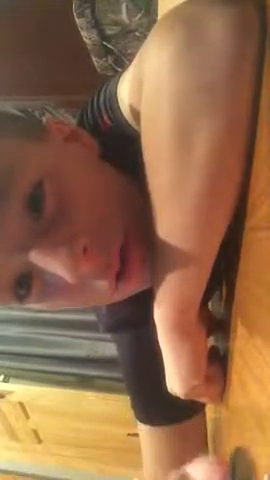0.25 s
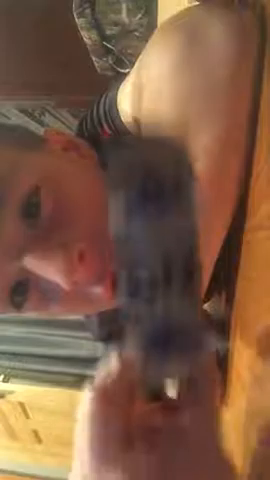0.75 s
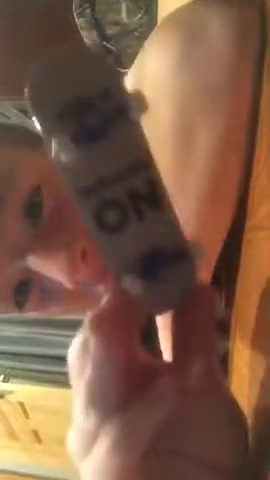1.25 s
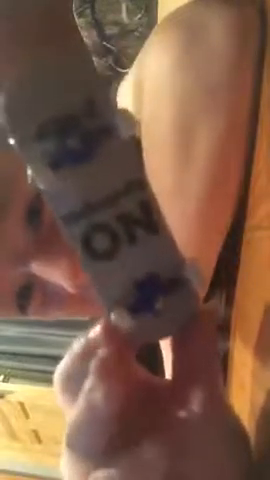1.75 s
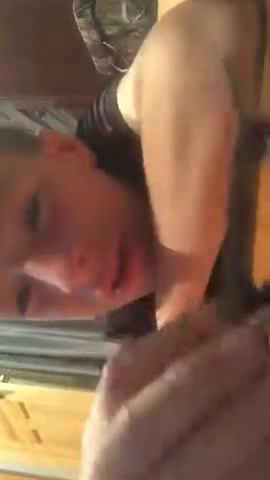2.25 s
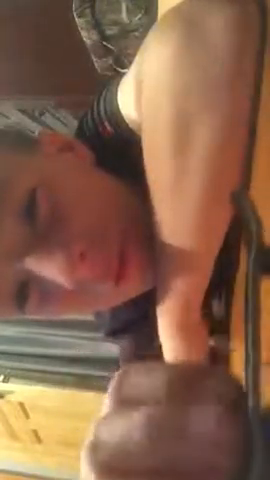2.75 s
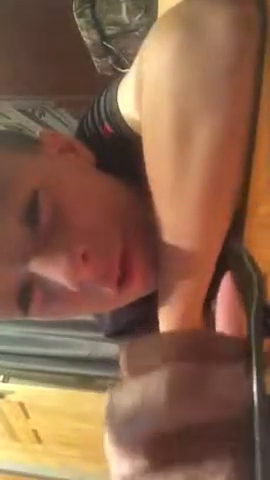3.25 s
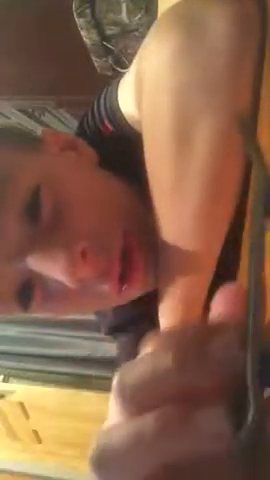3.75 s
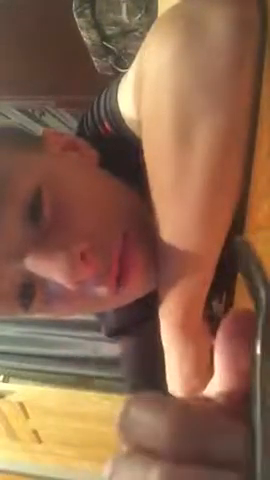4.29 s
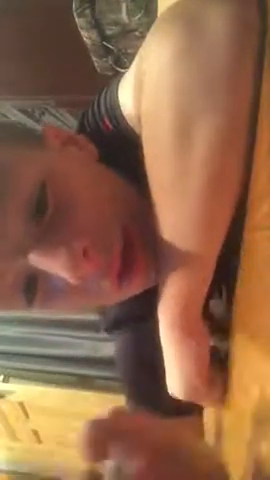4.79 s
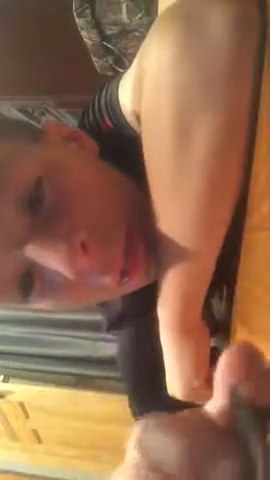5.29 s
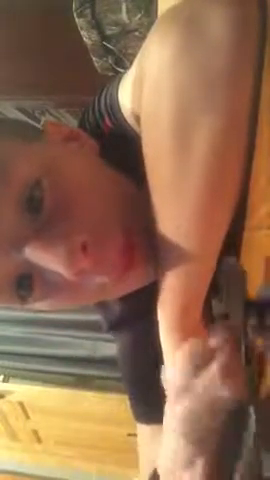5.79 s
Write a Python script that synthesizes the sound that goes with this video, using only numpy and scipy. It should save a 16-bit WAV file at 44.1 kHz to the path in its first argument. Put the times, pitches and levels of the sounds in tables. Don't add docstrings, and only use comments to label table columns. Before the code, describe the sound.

A toy skateboard is handled on a wooden table, very close to a phone microphone in a small furnished room with faint hiss and low room tone. At 0 s a soft palm thud and a short rumble of tiny wheels, then light ticks and a modest landing clack at 0.5. Quiet rolling leads to a loud, bright pop at 0.95 and a hard landing at 1.1. Soft rubbing until 1.8, then a rattling cluster of clacks around 1.95 and smaller knocks to 2.5. Another sharp pop at 2.7, landing at 2.9. From 3 to 4 only scrapes, faint taps and rubs. A loud pop at 4.15, woody slaps at 4.3, another at 4.65, then rolling and ticks. The last strong pop comes at 5.4, a heavy clattering landing at 5.6, a smaller slap at 5.95 and a final brief rumble. Dry, irregular, slightly overloaded.

```python
import sys
import numpy as np
from scipy import signal
from scipy.fft import rfft, irfft
from scipy.io import wavfile
from scipy.ndimage import uniform_filter1d

SR = 44100
rng = np.random.default_rng(int(sys.argv[2]) if len(sys.argv) > 2 else 0)


def wav_record(signal):
    frames = np.transpose(np.atleast_2d(signal))
    bounded = np.clip(frames, -1, 1)
    quanta = np.round(bounded * 32767).astype(np.int16)
    wavfile.write(sys.argv[1], SR, quanta)


def boost_factor(decibels):
    exponent = np.asarray(decibels, float) / 20
    return 10 ** exponent


N = 265923

# (frequency [Hz], level [dB], t60 [s])
TABLE_MODES = [(179, -2.5, 0.051), (246.2, 11.5, 0.043), (285, 7, 0.018)]
# (frequency [Hz], level [dB], t60 [s])
DECK_MODES = [(503.8, 8.5, 0.016), (570.5, 10.5, 0.016), (693.3, 11, 0.014), (800, 9.5, 0.0076),
              (950, 3, 0.015), (1100, 0, 0.021), (1270, -3.5, 0.024), (1505, -1.5, 0.009),
              (1650, -5, 0.018)]
# (time [s], frequency [Hz])
FREE_RING = [(0, 955), (.47, 850), (.93, 1050), (1.11, 713), (1.8, 1200), (1.96, 700), (2.18, 950),
             (2.35, 693), (2.64, 942), (2.89, 959), (3.3, 689), (4.13, 1100), (4.3, 828), (4.5, 680),
             (4.8, 729), (5.42, 1150), (5.6, 637), (6, 800)]
FREE_RING_DB = 4
DECK_LOW_HZ = 460
TAIL_HZ = 6200
TICK_MS = 1.8


def scaled(x, db):
    return x * boost_factor(db) / np.sqrt(np.mean(x ** 2))


def filtered(x, order, hz, kind):
    return signal.sosfilt(signal.butter(order, hz, kind, fs=SR, output="sos"), x)


def decay(t, t60):
    return np.exp(-np.log(1000) * t / t60)


def add(out, s, x):
    i = max(int(s * SR), 0)
    out[i:i + len(x)] += x[:len(out) - i]


def along(curve, s):
    return np.interp(s, *np.transpose(curve))


def favour(hz, centre_hz, db, spread=0.21):
    return db * np.exp(-(np.log(hz / centre_hz) / spread) ** 2)


def walk(rate):
    hold = int(SR / rate)
    steps = np.repeat(rng.standard_normal(N // hold + 1), hold)
    return np.clip(uniform_filter1d(steps, hold)[:N], -1.5, 1.5)


def air():
    # (frequency [Hz], density [dB per Hz])
    floor = [(26, -28), (45, -2), (90, 0.5), (125, -12), (205, 3.5), (431, -4.5), (908, -15.5),
             (1570, -14.5), (10300, -25), (17000, -35.5)]
    hz, db = np.transpose(floor)
    f = np.fft.rfftfreq(N, 1 / SR)
    shape = boost_factor(np.interp(np.log(f + 1), np.log(hz), db))
    hiss = irfft(rfft(rng.standard_normal(N)) * shape, N)
    hum = boost_factor(-71.5) * np.sin(2 * np.pi * 120 * np.arange(N) / SR)
    return scaled(hiss, -60) + hum


def room(x):
    # (frequency [Hz], t60 [s], level [dB])
    bands = [(140, 0.33, -21), (556, 0.28, -12), (1100, 0.34, -10), (1960, 0.19, -14.5), (4560, 0.34, -18),
             (7000, 0.19, -14), (11100, 0.35, -13.5), (16000, .2, -14.5)]
    early_db, early_s = 4.5, 0.021
    t = np.arange(int(.6 * SR)) / SR
    hz, t60, db = np.transpose(bands)
    tail = 0
    for f in 80 * 2 ** np.arange(0, 7.9, .5):
        band = filtered(rng.standard_normal(len(t)), 2, [f / 1.19, f * 1.19], "bandpass")
        band_t60, gain_db = (np.interp(np.log(f), np.log(hz), c) for c in (t60, db))
        tail = tail + boost_factor(gain_db) * band * decay(t, band_t60) / np.sqrt(band_t60 * SR / 14)
    onset = np.clip((t - .005) / 0.0037, 0, 1)
    return signal.fftconvolve(x, tail * boost_factor(early_db * np.exp(-t / early_s)) * onset)[:N]


def thuds():
    # (time [s], level [dB])
    settlings = [(0.009, -47), (0.49, -40.5), (0.91, -44), (1.111, -35), (1.229, -57), (2.641, -43),
                 (2.727, -66), (2.918, -37), (4.15, -43), (4.348, -37), (5.322, -46), (5.622, -36.5)]
    centre_hz, swell_s = 72, 0.035
    out, u = np.zeros(N), np.arange(SR // 4) / SR / swell_s
    for s, db in settlings:
        rumble = filtered(rng.standard_normal(len(u)), 2, [centre_hz / 2.4, centre_hz * 1.2], "bandpass")
        rumble = rumble * u * np.exp(-u)
        add(out, s - .02, boost_factor(db + 13.5) * rumble / np.abs(rumble).max())
    return out


def grit(modes, per_s, size_db, smooth, wander_db, wander_rate, centre_hz=1., centre_db=0.):
    happens = rng.random(N) < per_s / SR
    size = boost_factor(np.clip(size_db * rng.exponential(size=N), 0, 9))
    ticks = happens * size * np.clip(rng.standard_normal(N), -2, 2)
    push = scaled(ticks, 0) + smooth * rng.standard_normal(N)
    push = uniform_filter1d(push, max(int(SR / modes[-1][0] / 3), 1))
    out = 0
    for k, (hz, db, t60) in enumerate(modes):
        r = decay(1 / SR, t60)
        tone = signal.lfilter([1, 0, -1], [1, -2 * r * np.cos(2 * np.pi * hz / SR), r * r], push)
        mode_db = db + favour(hz, centre_hz, centre_db) + wander_db * walk(wander_rate)
        out = out + (-1) ** k * boost_factor(mode_db) * tone
    return scaled(out, 0)


def pushes(t):
    # (time of
    # most weight [s], dying time [s], deck level [dB], wheel spin level [dB], table level [dB])
    strokes = [(.01, 0.085, -25, -36, -38), (.34, 0.17, -40, -57, -40), (0.581, 0.099, -37, -47, -81),
               (.66, 0.1, -50.5, -63.5, -66.5), (1.06, 0.3, -43, -48.5, -55.5),
               (1.39, 0.073, -45.5, -43.5, -78.5), (1.47, 0.057, -51, -52, -41),
               (2.13, 0.15, -39.5, -51, -47), (2.32, 0.14, -39.5, -48.5, -45), (2.8, 0.33, -48, -54, -58),
               (2.95, 0.04, -56, -65.5, -42.5), (3.17, 0.23, -51, -51, -73.5),
               (3.26, 0.21, -41.5, -55.5, -48.5), (4.13, 0.066, -28.5, -46.5, -60),
               (4.26, 0.09, -31, -47, -37), (4.47, 0.22, -51.5, -54.5, -50), (4.68, 0.093, -44, -51, -44),
               (4.8, 0.13, -30.5, -43.5, -45), (4.94, 0.31, -42.5, -51.5, -46), (5.02, 0.11, -42, -51.5, -60),
               (5.12, 0.083, -43, -66, -70), (5.59, .1, -45, -47.5, -41), (6.03, 0.077, -24.5, -44, -38.5),
               (0.259, 0.098, -47, -58, -51), (1.36, 0.055, -74, -51, -76),
               (1.44, 0.056, -39.5, -51.5, -81), (1.86, 0.028, -63.5, -54, -66), (2.21, .05, -53, -49, -64),
               (2.285, 0.03, -63, -52, -59), (2.42, 0.022, -47, -52.5, -60),
               (2.514, 0.045, -49, -62.5, -53), (3.41, 0.044, -38, -59, -60), (3.639, 0.056, -45, -58, -58),
               (0.121, 0.054, -42, -56, -69), (0.819, 0.046, -48, -80.5, -67),
               (.73, 0.077, -47.5, -66.5, -52), (1.58, 0.044, -89, -62, -69), (1.29, 0.052, -97, -76, -48),
               (1.9, 0.076, -57, -61, -84.5), (2.48, .2, -36, -60, -56), (3.07, 0.034, -33, -63, -26.5),
               (3.43, 0.087, -41, -63, -58), (3.779, 0.12, -44, -54, -52), (3.91, 0.13, -39, -69.5, -56),
               (5.27, 0.23, -40, -72, -46.5), (5.438, 0.11, -35, -65, -49.5), (5.93, 0.12, -40, -57, -51)]
    # (table [dB], deck [dB], axle [dB], grip [dB])
    rest_db = (-64, -68, -82, -76)
    fade_db, rise_share, spin_fade = 21.5, 1, 1.87
    shake_db, shake_s = -30.5, 0.032
    slow = t[::64]
    gains = boost_factor(rest_db)[:, None] + 0 * slow
    for s, fade_s, deck_db, spin_db, table_db in strokes:
        drop_db = fade_db * np.maximum(slow - s, (s - slow) / rise_share) / fade_s
        spin = spin_db - spin_fade * drop_db ** 2 / fade_db
        grip = spin - 6.5
        gains = gains + boost_factor([table_db - drop_db, deck_db - drop_db, spin, grip])
    table, deck, axle, grip = (np.interp(t, slow, g) for g in gains)
    for s, _, thump_db, *_ in contacts():
        add(table, s, boost_factor(thump_db + shake_db) * np.exp(-t[:SR // 4] / shake_s))
    return table, deck, axle, grip


def rolling():
    # (time [s], length [s], axle level [dB], deck level [dB])
    drags = [(0.193, 0.095, -48.5, -45), (0.939, 0.022, -33, -19.5), (1.322, 0.04, -45.5, -82),
             (1.728, 0.052, -40.5, -47.5), (2.711, 0.0095, -46.5, -30), (2.798, 0.013, -34, -32),
             (2.984, 0.042, -45, -35), (3.095, 0.051, -52, -36), (3.214, 0.028, -55.5, -60),
             (3.584, 0.083, -48.5, -37.5), (3.98, 0.026, -55.5, -61), (4.122, 0.015, -28, -28),
             (4.267, 0.019, -37, -56), (5.359, 0.085, -48.5, -43.5), (5.406, 0.025, -37, -31),
             (5.858, 0.069, -59, -42.5)]
    # (frequency [Hz], level [dB], t60 [s])
    rub_modes = [(1670, -8, .005), (2200, -2.5, .009), (2800, -6.5, 0.0054), (3550, -4.5, .009),
                 (4050, -4.5, 0.0059), (4800, -3.5, 0.0054), (5500, -2, 0.01), (6200, -2.5, 0.0082),
                 (6720, 1.5, 0.003), (9500, -13, 0.0022), (12000, -25.5, .001)]
    # (time [s], frequency [Hz])
    rubbing_part = [(0, 4500), (.3, 2600), (.6, 3810), (1.36, 3300), (1.45, 4560), (1.58, 6200),
                    (1.76, 2200), (2.2, 4200), (2.3, 5600), (2.5, 5500), (3.0, 3500), (3.27, 3543),
                    (3.41, 2150), (3.99, 5840), (4.28, 2910), (4.78, 2300), (5.0, 4040), (5.9, 2440)]
    t = np.arange(N) / SR
    table, deck, axle, grip = pushes(t)
    for start, length, axle_db, deck_db in drags:
        u = t[:SR // 4] / length
        stop = np.exp(-np.clip(u - 1, 0, None) / 0.15)
        swell = np.clip(u, 0, 1) ** .45 * stop
        add(table, start, swell * boost_factor(deck_db - 3))
        add(deck, start, swell * boost_factor(deck_db))
        add(axle, start, swell * boost_factor(axle_db))
        add(grip, start, swell * boost_factor(axle_db - 5.5))
    press = boost_factor(2.5 * walk(25))
    deck_rub = grit(DECK_MODES, 450, 2.8, .6, 3, 17, along(FREE_RING, t), FREE_RING_DB)
    deck_rub = filtered(deck_rub, 2, DECK_LOW_HZ, "highpass")
    low = table * grit(TABLE_MODES, 600, 1.5, 1.2, 1.5, 12) + deck * deck_rub
    low = filtered(low, 1, 1610, "lowpass")
    part_hz, part_db = along(rubbing_part, t), 5
    high = axle * grit(rub_modes[:6], 1300, 3, .7, 4.5, 30, part_hz, part_db)
    high = high + grip * grit(rub_modes[6:], 1600, 3, .7, 4.5, 30, part_hz, part_db)
    return press * (low + high * boost_factor(2.5 * walk(70)))


def contacts():
    # (time [s], axle clack peak [dB], table thump [dB], deck knock [dB], chatter [ms])
    tail_pops = [
        (.9624, 3.5, -4, -14, 2.4),
        (2.7256, 4, -1.5, -9.5, 1.83),
        (3.46, -18, -23.5, -18.5, 1.95),
        (3.7484, -18, -24, -24.5, 0.35),
        (3.8076, -15, -18, -20.5, 3.2),
        (4.1458, 4.5, -0.5, -11, 1.4),
        (5.4296, 4.5, 2, -7.5, 1.18),
    ]
    wheel_landings = [(.4738, -10.5, -13, -10.5, 1.28), (.4918, -22, -21, -19.5, 1.7),
                      (.9311, -16.5, -27.5, -13.5, 1.7), (1.1076, 6, -0.5, -10.5, 1.77),
                      (1.1377, -6, -39.5, -11.5, 1.4), (1.1478, -7, -1, -28, 2.5),
                      (1.9354, -6.5, -14.5, -23, 1), (1.9482, -15, -32.5, -24, 0.49),
                      (1.9644, 0.5, -3.5, -4.5, 1.9), (2.0083, -15, -13.5, -18.5, 2),
                      (2.1868, -6.5, -16, -13.5, 1.64), (2.364, -22.5, -22, -18, 1.4),
                      (2.8496, -2, -7.5, -13, 1.9), (2.873, -15, -39, -28, 0.69),
                      (2.89, 0.5, -7.5, -2, 1.6), (3.053, -13.5, -15, -27.5, 0.99),
                      (4.6746, -13, -12, -12, 2.4), (4.856, -14, -19, -25, 2.7), (5.588, -7, -41, -14, 2.3),
                      (5.6119, 1.5, 2, 4.5, 1.67), (5.6334, -19, -10, -27, 2)]
    edge_slaps = [(.2322, -22.5, -26, -23, 3.5), (1.802, -8.5, -29.5, -11.5, 1.56),
                  (1.9424, -4, -21, -13.5, 1.2), (2.334, -21.5, -24, -15.5, 2.9),
                  (3.3206, -16, -51, -17, 1.46), (4.134, -8.5, -39.5, -51, 5.4),
                  (4.2772, -24, -29.5, -15, 5.8), (4.3133, -15.5, -32, -4.5, 3.4),
                  (4.3179, -4, 2.2, -40.5, 1.6), (4.3314, 1, -5, -4, 2.6), (4.3462, -23, -35, -33, 4.5),
                  (4.4889, -14.5, -19.5, -14, 1.84), (4.5587, -23.5, -18, -19.5, 0.81),
                  (4.6518, -0.5, -1, -2.5, 1.68), (5.6116, 4, -33.5, -26, 3),
                  (5.939, -18, -1.5, -11.5, 0.96)]
    # (time [s], peak [dB], brightest ring [Hz])
    axle_ticks = [(0.0972, -30.5, 4190), (0.2167, -28, 4570), (0.5425, -29, 4300), (0.6098, -26, 4140),
                  (0.899, -31.5, 6200), (1.044, -45, 6500), (1.2555, -36, 6600), (1.4587, -36, 5230),
                  (1.8174, -24.5, 6700), (1.978, -12.5, 3320), (2.1825, -13, 4440), (2.286, -26, 2060),
                  (2.32, -25, 2170), (2.4534, -34, 3800), (2.799, -25, 4230), (2.807, -34, 3640),
                  (2.8815, -18, 4010), (3.0472, -25.5, 4450), (3.1112, -24, 3420), (3.4528, -28.5, 4260),
                  (3.982, -49, 6200), (4.1133, -24.5, 2140), (4.8288, -19, 4600), (4.982, -29, 4010),
                  (5.0205, -40, 3880), (5.0759, -22.5, 6100), (5.4072, -29, 2260), (5.5774, -23.5, 4150),
                  (5.74, -24.5, 2300), (5.875, -26.5, 2230)]
    # (time [s], deck level [dB], table level [dB])
    soft_knocks = [(.2683, -40, -27.5), (.3583, -30, -29), (.4002, -31, -64), (.4597, -23, -49),
                   (.7544, -53, -44), (2.1107, -25, -20.5), (2.3057, -23.5, -55), (2.413, -17, -31),
                   (2.4264, -20, -41), (2.5026, -25, -24), (2.6318, -28, -23), (2.6404, -15.5, -41),
                   (2.6615, -17, -32), (2.8634, -18.5, -27), (3.019, -24.5, -44), (3.1395, -21.5, -45),
                   (3.3444, -26, -19.5), (3.3997, -25, -57), (3.4129, -21.5, -51), (3.6045, -25, -31),
                   (3.6574, -19, -41), (4.0617, -30.5, -28.5), (4.2125, -29, -17), (4.6634, -22, -37),
                   (4.9423, -20, -40), (5.0035, -21, -44), (5.7495, -29, -32), (5.9963, -27.5, -61)]
    # (time [s], axle level [dB], deck level [dB], brightest ring [Hz], chatter [ms])
    rebounds = [(.2668, -31.5, -34, 5000, 2), (.4005, -43, -64, 4600, 1.8), (.681, -41, -50, 3820, 2.3),
                (1.6695, -55, -58.5, 6000, 1.5), (1.9385, -10, -17, 3430, 2),
                (1.9462, -9.5, -19, 4500, 1.5), (2.0005, -23, -33, 4000, 2.6), (2.306, -34, -33, 6700, 2),
                (2.413, -34.5, -43, 7000, 3.3), (2.427, -38, -52, 7000, 1.6), (2.505, -35, -50, 5500, 2),
                (2.6299, -27.5, -43, 5630, 1.7), (2.857, -12, -19, 4000, 1.4), (2.868, -19, -43, 4030, 1),
                (3.021, -28, -42, 3430, 1.8), (3.1398, -37, -51, 2140, 2.5), (3.5892, -40, -51, 7000, 1.6),
                (4.0597, -40, -50, 6000, 2), (4.072, -38, -37, 2200, 2.2), (4.6675, -13.5, -24, 5500, 1.5),
                (4.7815, -36, -45, 6000, 1.3), (4.9432, -22, -42, 4020, 2.2),
                (5.4325, -2.5, -15.5, 4300, 1.2), (5.6195, -17, -11.5, 4600, 1.5)]
    tick_table_db, tick_deck_db = -15.5, -7
    rows = []
    for kind, hz in ((tail_pops, TAIL_HZ), (wheel_landings, 4150), (edge_slaps, 2440)):
        rows += [(s, axle, table, deck, hz, ms) for s, axle, table, deck, ms in kind]
    rows += [(s, db, db + tick_table_db, db + tick_deck_db, hz, TICK_MS) for s, db, hz in axle_ticks]
    rows += [(s, deck - 15, table, deck, 2600, 2.6) for s, deck, table in soft_knocks]
    rows += [(s, axle, axle + tick_table_db, deck, hz, ms) for s, axle, deck, hz, ms in rebounds]
    return rows


def evened(push):
    spec = rfft(push)
    even = irfft(spec / np.sqrt(uniform_filter1d(np.abs(spec) ** 2, size=21)), len(push))
    return even * np.clip(np.linspace(5, -1, len(push)), 0, 1)


def ring(modes, tweak_db, detune):
    hz, db, t60 = np.transpose(modes)[:, :, None]
    t = np.arange(int(SR * t60.max())) / SR
    sines = np.sin(2 * np.pi * hz * detune[:, None] * t) * decay(t, t60)
    sign = (-1.) ** np.arange(len(modes))[:, None]
    return (sign * boost_factor(db + tweak_db[:, None]) * sines).sum(axis=0)


def struck(push, modes, chance, favour_db=0.):
    k, chance = len(modes), np.clip(chance, -1.6, 1.6)
    response = ring(modes, 2.5 * chance[:k] + favour_db, 1 + .02 * chance[-k:])
    x = signal.fftconvolve(push, response)
    return x / np.abs(x).max()


def clacks():
    # (frequency [Hz], level [dB], t60 [s])
    axle_modes = [(2230, -2, 0.0038), (3014, -11, 0.013), (3350, -4, 0.0052), (3890, 0, 0.0048),
                  (4312, 2.5, 0.0036), (5205, -3.5, 0.0048), (6065, 1.5, 0.0031), (7100, 4.5, 0.0012),
                  (8550, -1.5, 0.0017), (9500, -9.5, 0.0018)]
    buzz_db, buzz_s = -43, 0.021
    crack_db, crack_hz = -23, 8000
    out, t = np.zeros(N), np.arange(3072) / SR
    axle_hz = np.array(axle_modes)[:, 0]
    deck_hz = np.array(DECK_MODES)[:, 0]
    for s, axle_db, table_db, deck_db, hz, ms in contacts():
        chatter = rng.standard_normal(len(t))
        axle_chance, deck_chance, table_chance = rng.standard_normal((3, 24))
        u = t / (max(ms, .3) / 1000)
        fade = (1 - np.exp(-u / 0.26)) * np.exp(-u ** 1.06)
        buzz = boost_factor(buzz_db) * np.exp(-t / buzz_s) * np.clip(u, 0, 1)
        hardness = 2.8 * np.log2(hz / 4000) + 0.13 * (axle_db + 5)
        hard_db = hardness * np.clip(np.log2(axle_hz / 4000), 0, None)
        favour_db = favour(axle_hz, hz, 6.5 + 0.11 * axle_db, 0.32) + hard_db
        blow = evened(np.roll((fade + buzz) * chatter, 64))
        clack = struck(blow, axle_modes, .7 * axle_chance, favour_db)
        add(out, s - .0026, boost_factor(axle_db - 1.5) * clack)

        crack = evened(np.roll((fade + buzz) * chatter[::-1], 64))
        crack = filtered(crack, 2, [crack_hz, crack_hz * 1.7], "bandpass")
        add(out, s - .0024, boost_factor(axle_db + crack_db + 1.7 * hard_db[-1]) * crack / np.abs(crack).max())

        is_pop = hz == TAIL_HZ and ms != TICK_MS
        free_hz = 534 if is_pop else along(FREE_RING, s)
        blow = filtered(fade * (0.24 + chatter), 2, DECK_LOW_HZ, "highpass")
        knock = struck(blow, DECK_MODES, 0.92 * deck_chance, favour(deck_hz, free_hz, FREE_RING_DB))
        add(out, s - .0008, boost_factor(deck_db - 3.0) * knock)

        thump = struck(np.hanning(80), TABLE_MODES, 1.1 * table_chance)
        add(out, s + 0.00036, boost_factor(table_db - 10.5) * thump)
    return out


def scene():
    dry = clacks() + rolling()
    return (dry + room(dry) + thuds())[None]


def band_limit(x):
    return signal.sosfilt(signal.butter(12, 18440, fs=SR, output="sos"), x)


def record(dry):
    thin = filtered(dry, 2, 175, "highpass") + air()
    clipped = np.clip(thin, -1.02, 1.02)
    cut = signal.sosfilt(signal.ellip(6, .3, 45, 17300, fs=SR, output="sos"), clipped)
    return band_limit(cut)


dry = scene()
out = record(dry)
wav_record(out)
```